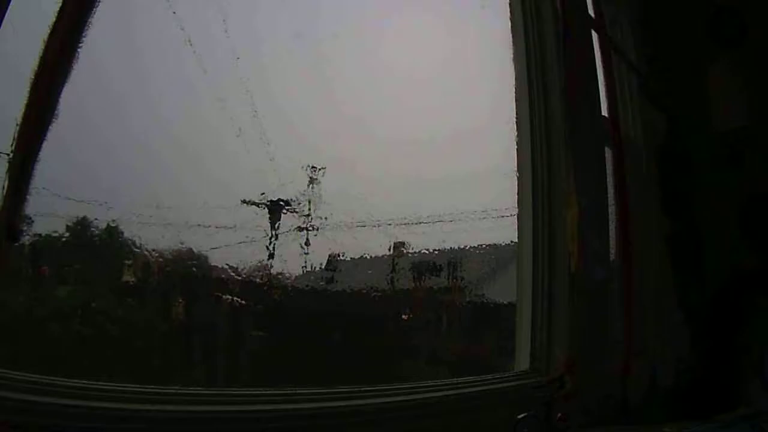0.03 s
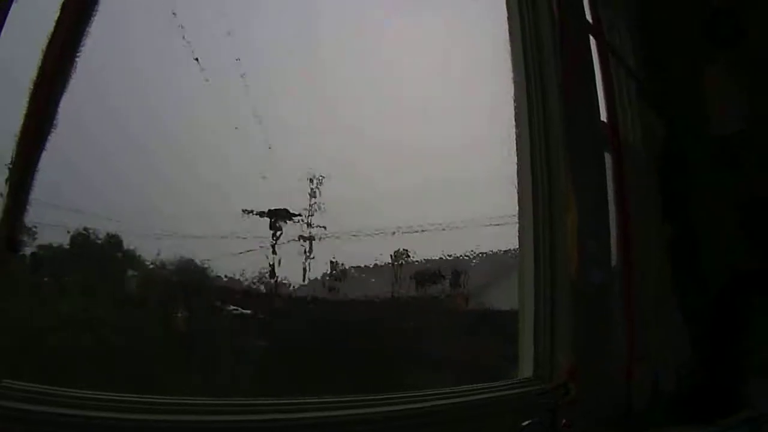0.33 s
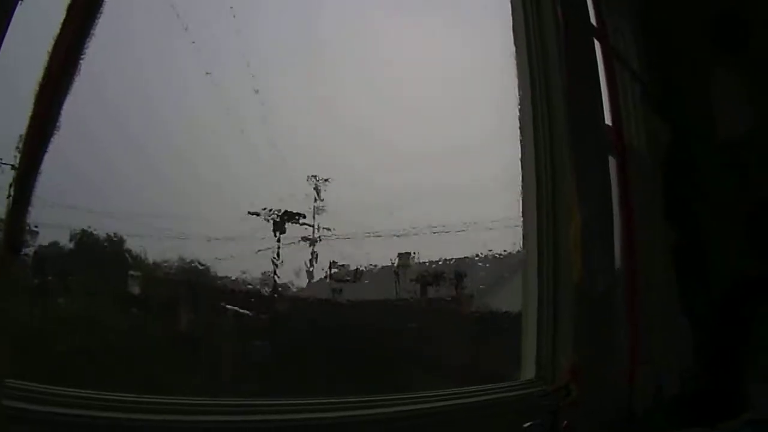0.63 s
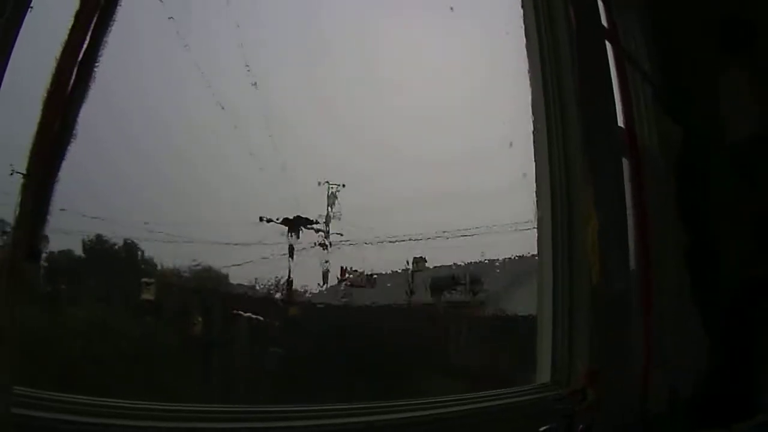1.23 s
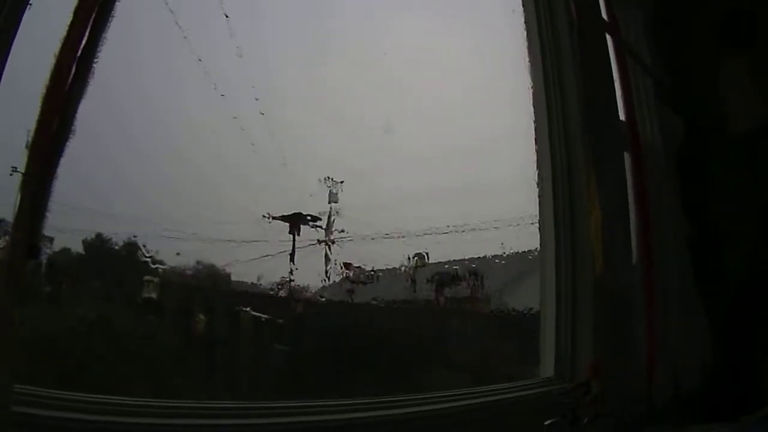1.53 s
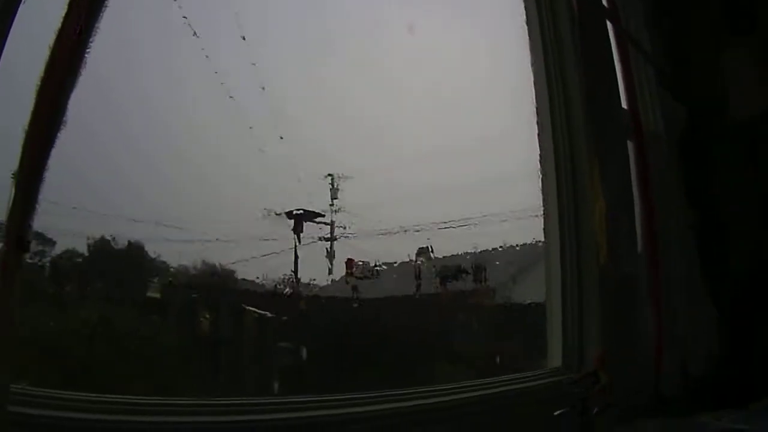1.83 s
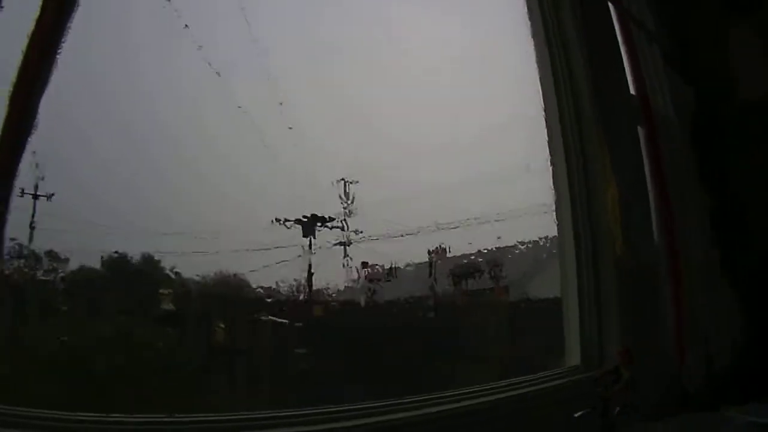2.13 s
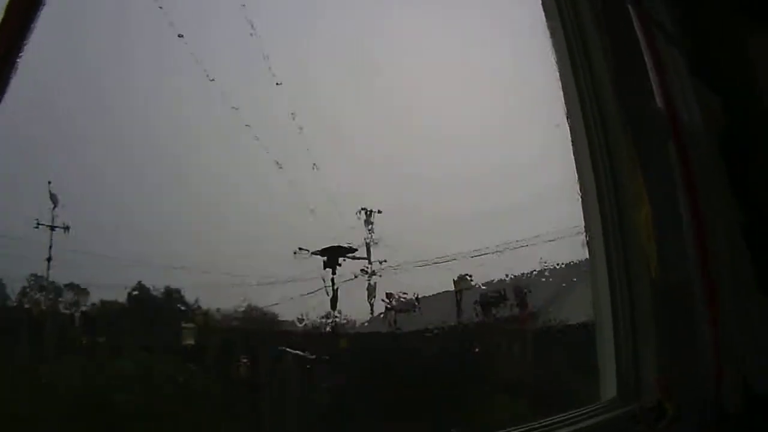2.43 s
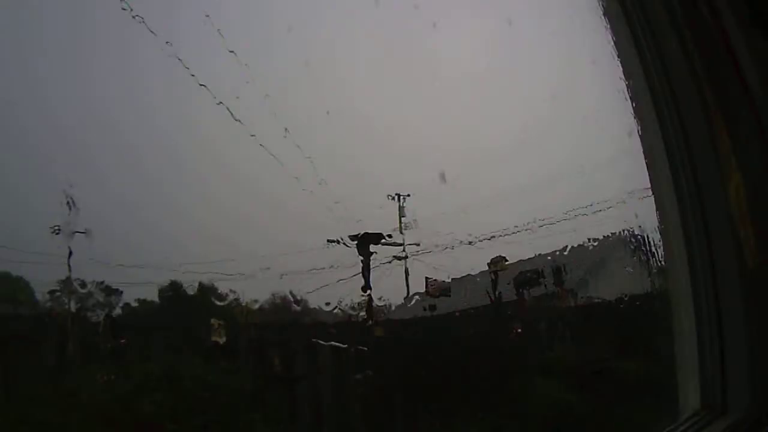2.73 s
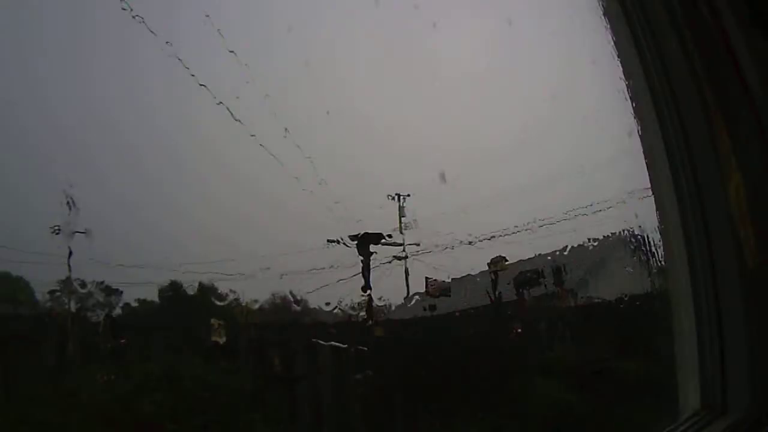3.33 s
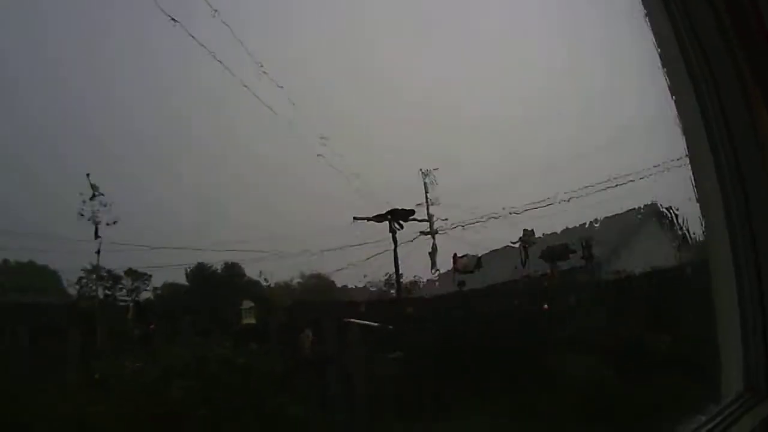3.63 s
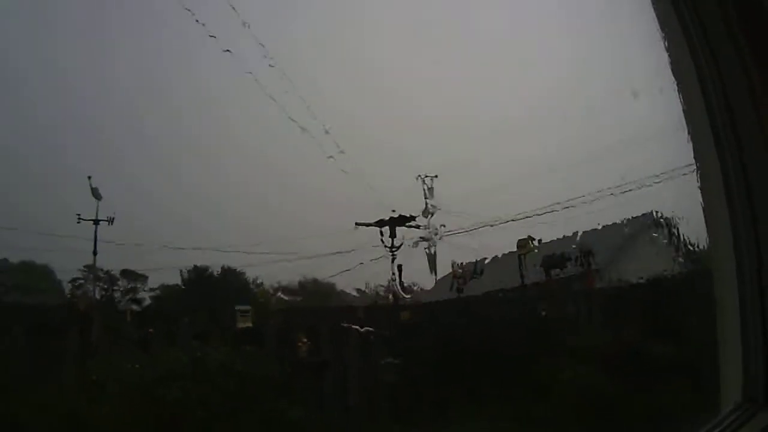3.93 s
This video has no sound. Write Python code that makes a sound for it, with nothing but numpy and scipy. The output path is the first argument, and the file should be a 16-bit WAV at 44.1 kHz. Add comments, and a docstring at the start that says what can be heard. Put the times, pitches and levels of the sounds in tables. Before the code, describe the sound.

Steady rain is heard from indoors through a closed window, starting at about 0.1 seconds with a sharp pop as the dull-sounding microphone switches on. The quiet wash, fine patter and low rumble continue throughout. A faint, rapidly pulsing electronic whine grows a little clearer around 3 seconds while the rain's hiss dips. At about 3.9 seconds one large drop taps the pane.

```python
"""A pop as a small camera's narrow-band microphone switches on, then steady rain through a closed window.
Distant rain washes, spray hisses, small drops patter, and the downpour rumbles through roof and walls.
The camera's electronics add a faint whine that pulses 24 times a second.
Near the end one large drop rings the pane."""
import sys
import numpy as np
from scipy import signal
from scipy.fft import rfft, irfft
from scipy.io import wavfile
from scipy.ndimage import uniform_filter1d

SR = 44100
rng = np.random.default_rng(int(sys.argv[2]) if len(sys.argv) > 2 else 0)


def put_to_file(sound):
    """Save the sound as 16-bit audio at rate SR, in the file named by the first command-line argument."""
    columns = np.atleast_2d(sound).T  # one column per channel
    safe = np.clip(columns, -1, 1)
    whole_steps = np.round(safe * 32767)
    wavfile.write(sys.argv[1], SR, whole_steps.astype(np.int16))


N = 176400
TIME_S = np.arange(N) / SR


def amp(db):
    """Decibels to gain."""
    return 10 ** (np.asarray(db) / 20)


def unit_rms(x):
    """Scales to an rms of one."""
    return x / np.sqrt(np.mean(x ** 2) + 1e-20)


def curve(points):
    """Reads a time curve at every sample."""
    return np.interp(TIME_S, *np.transpose(points))


def colour(x, spectrum):
    """Filters by a dB spectrum, interpolated over log frequency."""
    freq_hz, gain_db = np.transpose(spectrum)
    bin_hz = np.fft.rfftfreq(N, 1 / SR)
    bin_db = np.interp(np.log(bin_hz + 1), np.log(freq_hz + 1), gain_db)
    return irfft(rfft(x) * amp(bin_db), N)


def patchy_noise(spectrum, patch_db, flicker_db=0):
    """Coloured noise with drifting time-frequency patches and a quick flicker shared by all bands."""
    frames = N // 128 + 5
    real, imag, patches = rng.standard_normal((3, frames, 257))
    patches = uniform_filter1d(patches, size=20, axis=0)
    patches = unit_rms(uniform_filter1d(patches, size=7, axis=1))
    flicker = unit_rms(uniform_filter1d(rng.standard_normal(frames), size=5))[:, None]
    bins = (real + 1j * imag) * amp(patch_db * patches + flicker_db * flicker)
    noise = signal.istft(bins.T, nperseg=512, noverlap=384)[1][:N]
    return unit_rms(colour(noise, spectrum))


def switch_on_pop(age_s, level_db=-19.5, spike_decay_s=0.00045, swing_decay_s=0.0017):
    """The microphone switches on: a sharp negative spike, then a small, slower swing back."""
    spike = np.exp(-age_s / spike_decay_s)
    swing = 0.18 * np.exp(-age_s / swing_decay_s)
    return amp(level_db) * (swing - spike)


# Distant rain spectrum: freq_hz, relative_density_db
WASH_SPECTRUM = [(100, -15), (250, -4), (450, -0.5), (800, -5), (1400, -4.5), (2100, -6.5), (2700, -10.5),
                 (3700, -14), (4300, -22.5)]

def wash():
    """Distant drops merge into an even noise."""
    return patchy_noise(WASH_SPECTRUM, patch_db=0.18, flicker_db=0.54)


def patter(drops_per_s=500, low_hz=696, high_hz=4330, pitches=30, spread_db=2.5, decay_cycles=2.9):
    """Many small drops, each a tick of a few cycles at one of a set of pitches."""
    age_s = np.arange(0, 0.02, 1 / SR)
    out = np.zeros(N)
    for pitch_hz in np.geomspace(low_hz, high_hz, pitches):
        hits = rng.random(N) < drops_per_s / pitches / SR
        sizes = amp(spread_db * np.minimum(rng.exponential(1, N), 4))
        tick = np.sin(2 * np.pi * pitch_hz * age_s) * np.exp(-pitch_hz * age_s / decay_cycles)
        out += signal.oaconvolve(hits * sizes, tick)[:N]
    return unit_rms(out)


# Rain strength at the window: time_s, gain_db
RAIN_GAIN = [(0, 1.7), (.88, 1.4), (1.02, 0.2), (1.4, 1), (1.72, -0.4), (1.96, 2.3), (2.2, 0), (2.55, 0),
             (2.85, -1.2), (3.35, -1.4), (3.7, 0.5), (4, -2.1)]

def rain(wash_db=-55.5, patter_db=-63):
    """Distant wash and nearer patter swell and ease together."""
    return amp(curve(RAIN_GAIN)) * (amp(wash_db) * wash() + amp(patter_db) * patter())


# Spray spectrum: freq_hz, relative_density_db
SPRAY_SPECTRUM = [(1000, -27), (2000, -5.5), (2700, -0.5), (3700, 1), (4400, -5)]
# Spray strength: time_s, gain_db
SPRAY_GAIN = [(0, 2.5), (1, 1), (1.6, 2), (2.3, 0.5), (2.66, 2.5), (2.76, -4), (2.98, -7), (3.3, -7.5),
              (3.45, -1.5), (3.72, 2), (4, 4)]

def spray(base_db=-61):
    """Fine spray hisses, dipping around the three-second mark."""
    hiss = patchy_noise(SPRAY_SPECTRUM, patch_db=2, flicker_db=0.5)
    return amp(base_db + curve(SPRAY_GAIN)) * hiss


# Room rumble spectrum: freq_hz, relative_density_db
RUMBLE_SPECTRUM = [(10, -20), (22, -6.5), (45, -0.5), (80, -2.5), (115, -0.5), (160, -2), (230, -3),
                   (330, -7), (600, -15.5), (1500, -34)]
# Rumble strength: time_s, gain_db
RUMBLE_GAIN = [(0, -2), (.5, -1), (1.15, 0.7), (1.7, -1), (2.1, 0), (2.26, 1.5), (2.45, 1), (2.6, -0.1),
               (2.75, 0.9), (3.6, 1), (4, -0.3)]

def rumble(base_db=-53.5):
    """The downpour comes through roof and walls as a dull, low noise."""
    return amp(base_db + curve(RUMBLE_GAIN)) * patchy_noise(RUMBLE_SPECTRUM, patch_db=0.5)


# Whine partials: pitch_hz, relative_db
WHINE_PARTIALS = [(2275, 2.5), (2323, -13), (2488, -9.5), (3515, -13.5), (3725, -9), (4275, -9.5)]
# Strength of the partials: time_s, gain_db
WHINE_GAIN = [(0, -69.5), (.62, -66), (1.1, -68), (2.0, -66.5), (2.62, -65.5), (2.74, -61), (3.15, -61),
              (3.5, -63), (3.7, -65), (4, -67)]
# Pulsed hiss spectrum: freq_hz, relative_density_db
WHINE_HISS_SPECTRUM = [(500, -22), (1500, -8), (2400, -2.5), (3700, 0.5), (4400, -6.5)]

def whine(pulse_hz=24.06, pulse_align_s=2.732, duty=0.56, edge_cycles=0.015, hiss_db=-61):
    """The electronics sing and hiss in short, even, sharply switched bursts."""
    cycle = ((TIME_S - pulse_align_s) * pulse_hz) % 1
    gate = np.clip(np.minimum(cycle, duty - cycle) / edge_cycles, 0, 1)
    tone = np.zeros(N)
    for pitch_hz, relative_db in WHINE_PARTIALS:
        tone += amp(relative_db) * np.sin(2 * np.pi * (pitch_hz * TIME_S + rng.random()))
    hiss = amp(hiss_db) * unit_rms(colour(rng.standard_normal(N), WHINE_HISS_SPECTRUM))
    return gate * (tone * amp(curve(WHINE_GAIN)) + hiss)


# Drop on the pane: start_s, level_db
PANE_HITS = [(3.8997, -42.5)]
# Pane modes: pitch_hz, relative_db, t60_s
PANE_MODES = [(770, -15, 0.033), (1400, -1, 0.022), (1440, -11, .07), (1720, -2, .014), (3080, -6.5, .02),
              (3600, -15, 0.027)]

def drop_on_pane():
    """A large drop rings the window's modes briefly."""
    out = np.zeros(N)
    for start_s, level_db in PANE_HITS:
        age_s = np.maximum(TIME_S - start_s, 0)
        for pitch_hz, relative_db, t60_s in PANE_MODES:
            decay = np.exp(-np.log(1000) * age_s / t60_s)
            out += amp(level_db + relative_db) * decay * np.sin(2 * np.pi * pitch_hz * age_s)
    return out


def scene():
    """Everything that reaches the microphone, in mono."""
    return (rain() + spray() + rumble() + whine() + drop_on_pane())[None]


# Microphone treble roll-off: freq_hz, gain_db
MIC_RESPONSE = [(3750, 1), (3900, -2), (4200, -7.5), (4400, -22), (4550, -39), (4700, -72.5), (5200, -100)]

def record(dry):
    """Silence until the dull microphone switches on; a low-pass then limits both scene and pop."""
    switch_on_s, cutoff_hz = 0.0725, 16800
    age_s = np.maximum(TIME_S - switch_on_s, 0)
    live = (age_s > 0) * (colour(dry[0], MIC_RESPONSE) + switch_on_pop(age_s))
    low_pass = signal.firwin(511, cutoff_hz, window=("kaiser", 9), fs=SR)
    return signal.oaconvolve(live, low_pass, "same")[None]


dry = scene()
out = record(dry)
put_to_file(out)
```